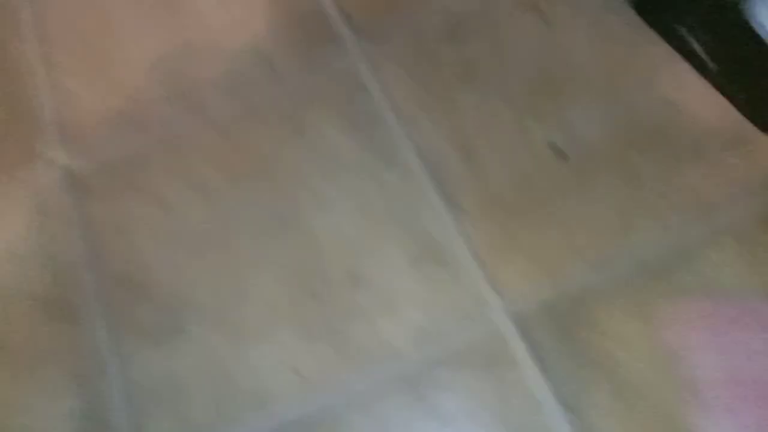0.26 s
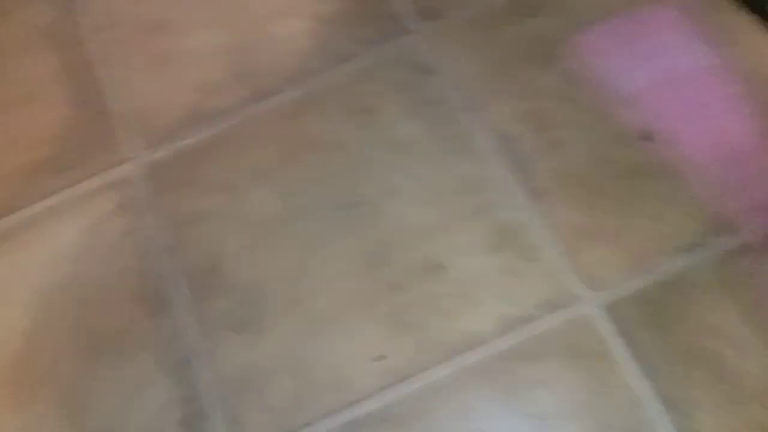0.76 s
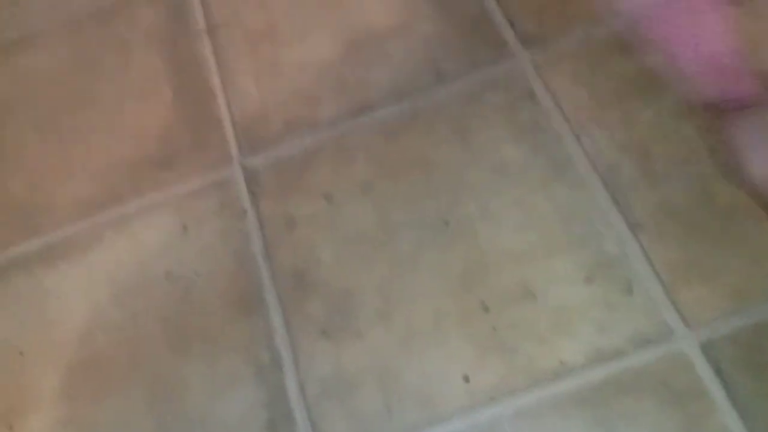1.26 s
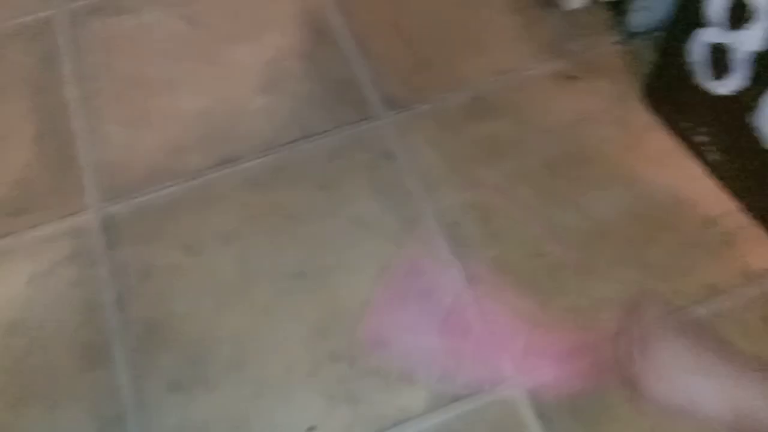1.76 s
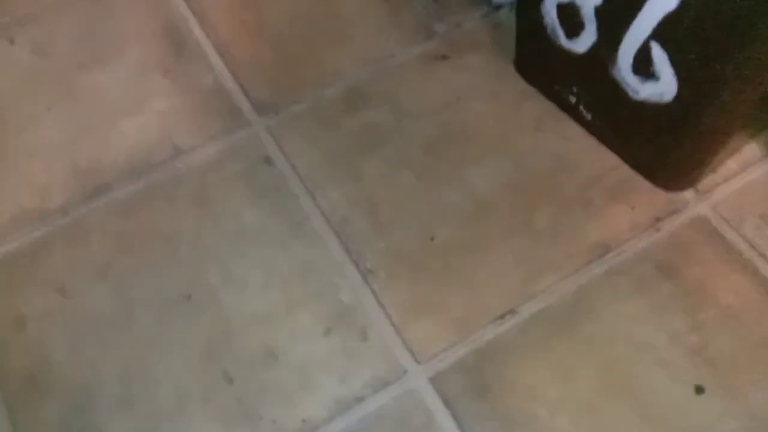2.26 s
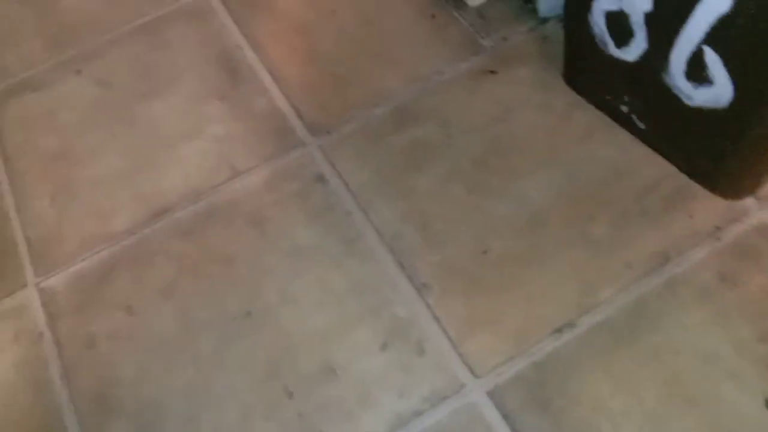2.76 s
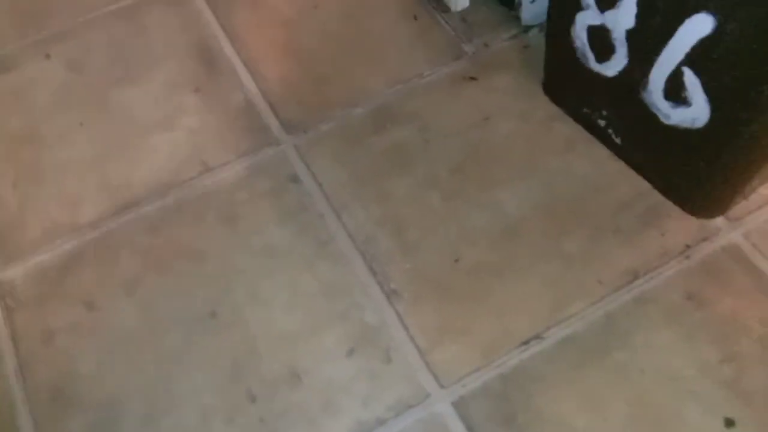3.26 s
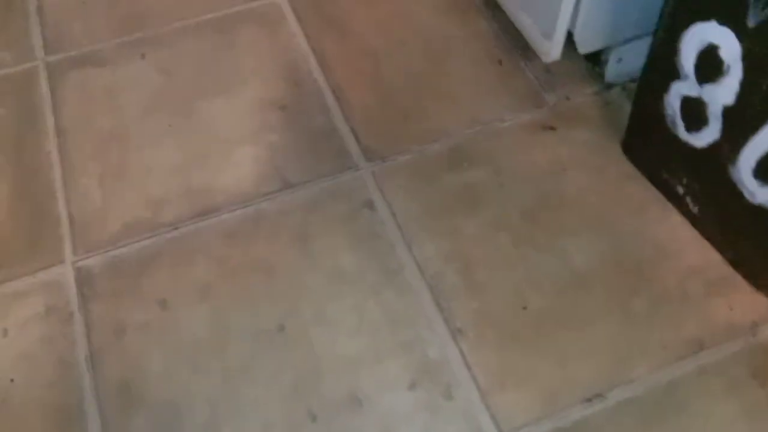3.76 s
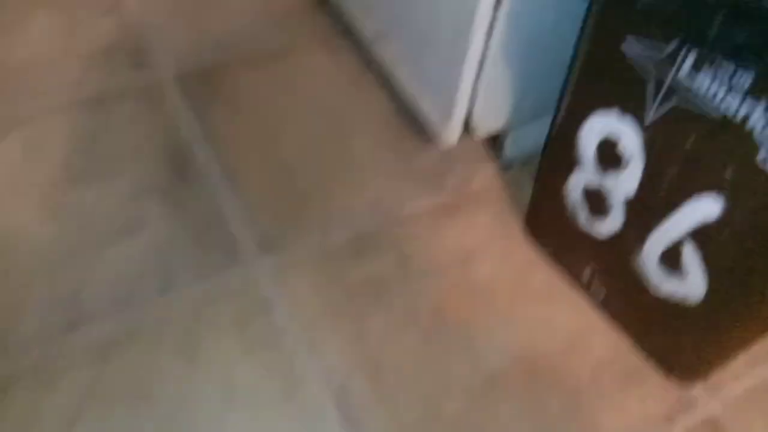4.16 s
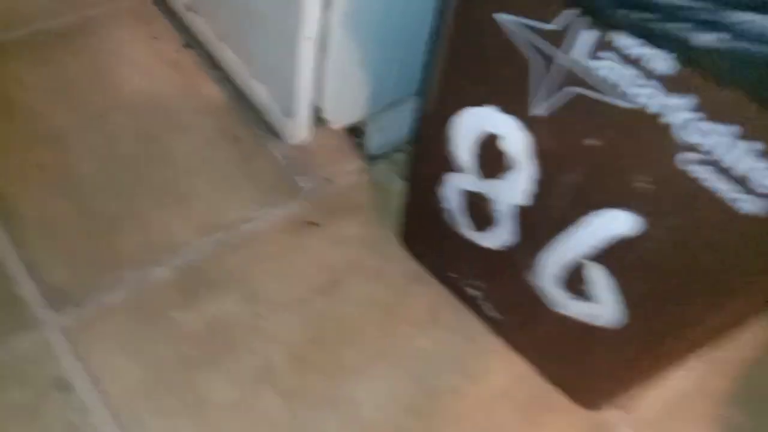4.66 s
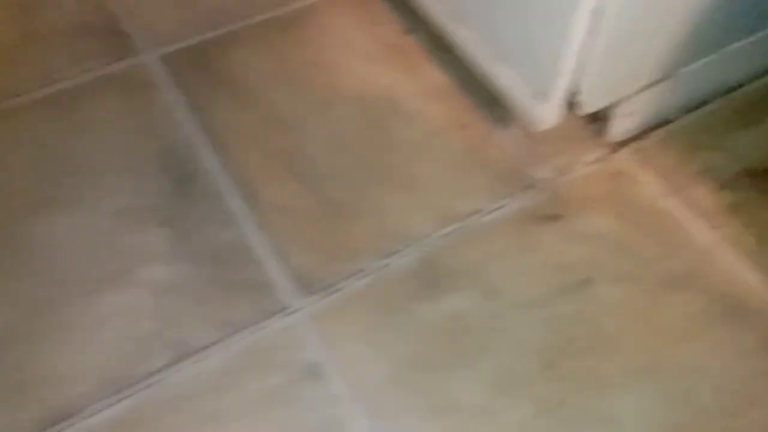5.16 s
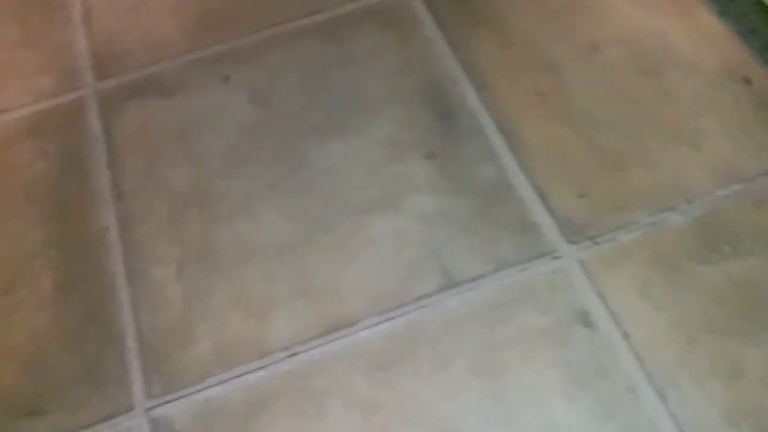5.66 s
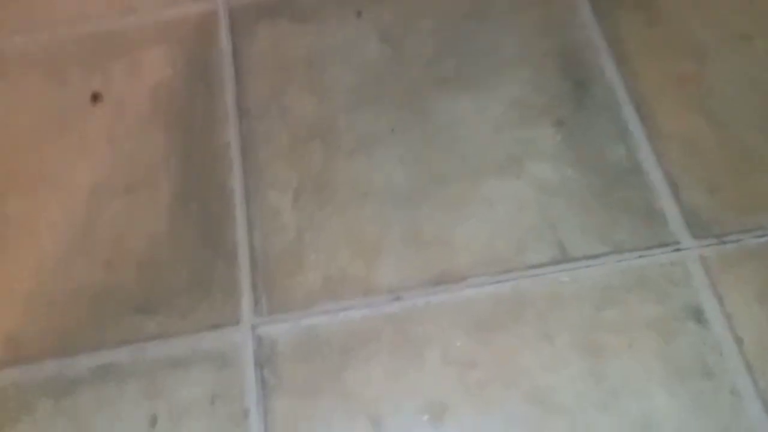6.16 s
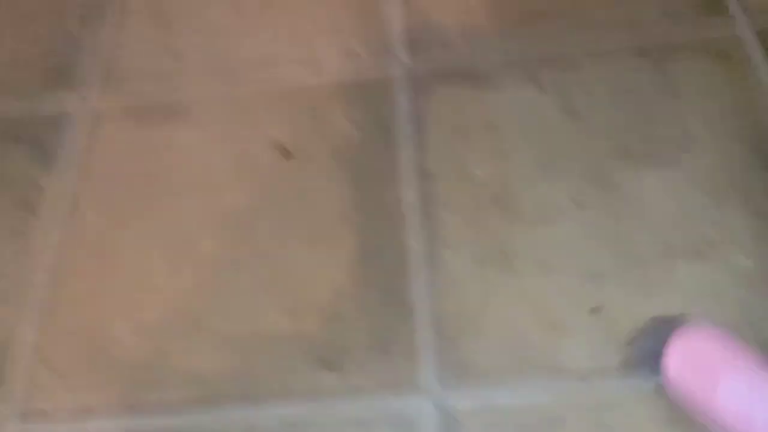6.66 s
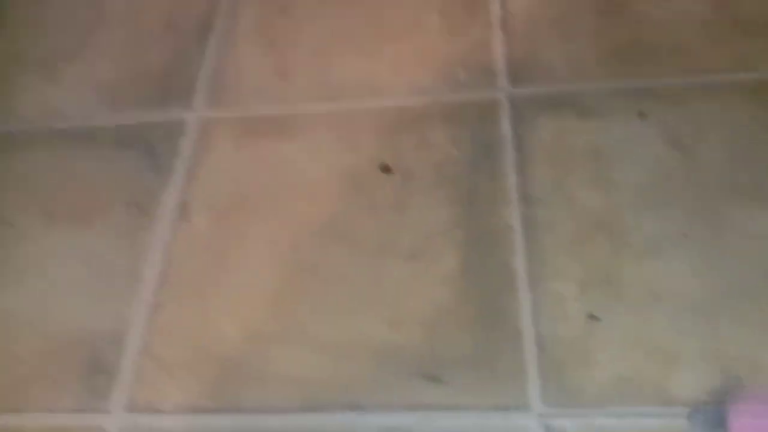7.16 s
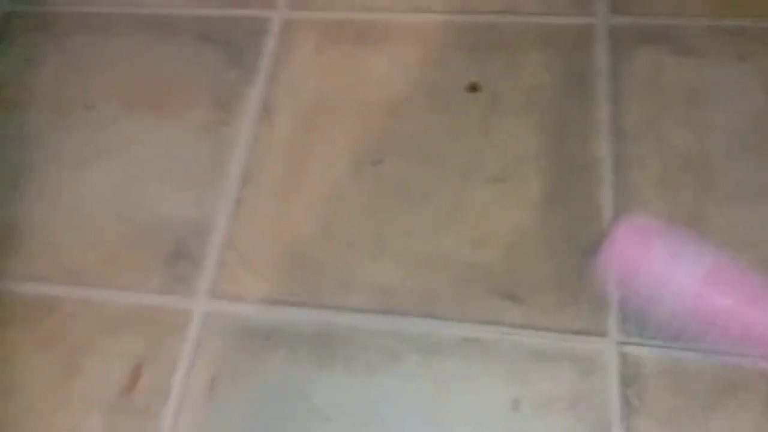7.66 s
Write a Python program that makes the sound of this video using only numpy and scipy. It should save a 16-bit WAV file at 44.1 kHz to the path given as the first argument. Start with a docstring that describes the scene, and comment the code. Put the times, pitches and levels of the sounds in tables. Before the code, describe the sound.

A phone microphone sits close to a hard tiled kitchen floor. From 0 to 1.8 s a hand brush makes quick, uneven strokes: a small tick at the start, then crisp bristle slaps with short scratchy swishes about every 0.15 s or so. After a brief gap, at 2.3-2.8 s a hollow plastic dustpan scrapes loudly, its lip chattering and singing a rough midrange note amid a dense burst of clacks. A softer drag runs from 3.1 to 3.8 s. From 4.1 to 5.0 s scraping and brushing overlap, with hollow bumps near 4.3, 4.8 and 4.9 s. Light taps come around 5.2 s, then plastic knocks at 5.5, 5.7 and a sharp one at 5.8 s. Separate brush strokes follow near 6.2, 6.7, 7.2 and 7.7 s. A short room tail and very faint fridge hum remain beneath.

```python
"""Short strokes of a hand brush over a tiled kitchen floor; in the middle a plastic dustpan is dragged and knocked.
Brush, pan lip and rasping edge are streams of tiny random slips, coloured by filters and shaped by level curves.
Each blow is a noisy push that cracks, rings the hollow pan and thumps the floor; light taps are short spikes.
The hard room answers with a short tail, a hollow bin rings along, and a fridge hums faintly in the still air."""
import sys
import numpy as np
from scipy import signal
from scipy.fft import rfft, irfft, next_fast_len
from scipy.io import wavfile
from scipy.ndimage import uniform_filter1d, map_coordinates

SR = 44100
rng = np.random.default_rng(int(sys.argv[2]) if len(sys.argv) > 2 else 0)


def inscribe(sig):
    """Save sig as 16-bit PCM at rate SR to the path in sys.argv[1].

    A 1-D sig is mono; a 2-D sig holds one channel per row.
    Samples are clipped to [-1, 1] before scaling.
    """
    pcm = np.round(np.clip(np.atleast_2d(sig).T, -1, 1) * 32767)
    wavfile.write(sys.argv[1], SR, pcm.astype(np.int16))


N = 348328
T = np.arange(N) / SR  # time of every sample [s]

# resonances of the pan's hollow shell: (centre [Hz], width [Hz], relative level [dB])
HOLLOW = [(168, 58, -7), (231, 21, 4.5), (260, 120, -2.5), (399, 56, -1), (499.6, 38, -2),
          (650.5, 60, -2.5), (817, 116, -3), (1235, 39, 1), (1880, 210, -5.5), (2577, 840, 3)]
# boom of the floor and room: (centre [Hz], width [Hz], relative level [dB])
SLAB = [(54, 6.3, -13.5), (88.3, 16, -3), (142, 23, -3.5)]


def amp(db):
    """Turn decibels into a plain gain."""
    return 10 ** (np.asarray(db) / 20)


def along(points, hz):
    """Read (Hz, value) points at any frequency, on a log axis."""
    f, v = np.transpose(points)
    return np.interp(np.log(hz + 1), np.log(f + 1), v)


def gains(tables):
    """One gain per sample for each dB column; silence outside the tables."""
    out = np.zeros((len(tables[0][0]) - 1, N))
    for rows in tables:
        s, *cols = np.transpose(rows)
        inside = (T >= s[0]) & (T < s[-1])
        out[:, inside] += amp([np.interp(T[inside], s, c) for c in cols])
    return out


def wobble(rate):
    """A smooth random curve with rate knots a second."""
    knots = rng.standard_normal(int(N * rate / SR) + 4)
    return map_coordinates(knots, [T * rate])


def filtered(x, response):
    """Pass x through a filter given as a function of frequency."""
    m = next_fast_len(len(x) + SR // 4)
    spectrum = rfft(x, m) * response(np.fft.rfftfreq(m, 1 / SR))
    return irfft(spectrum, m)[:len(x)]


def modes(table):
    """Filter of (Hz, width, dB) resonances that ring only after they are hit; their signs alternate."""
    def response(f):
        total = 0
        for k, (centre, width, db) in enumerate(table):
            resonance = 1j * f * width / (centre * centre - f * f + 1j * f * width)
            total = total + (-1) ** k * amp(db) * resonance
        return total
    return response


def shape(points):
    """Filter that follows (Hz, dB) points."""
    return lambda f: amp(along(points, f))


def rub(response, band, spiky_db):
    """Rubbing is many tiny slips of uneven size, filtered; scaled to rms 1 inside the band [Hz]."""
    slips = rng.standard_normal(N) * amp(spiky_db * rng.standard_normal(N))
    f = np.arange(1, SR // 2)
    inside = np.abs(response(f)) * (f > band[0]) * (f < band[1])
    return filtered(slips, response) / np.std(slips) / np.sqrt(np.mean(inside ** 2))


def patchy(x, patchy_db):
    """Uneven glaze and grit: the colour of a rub shifts in small random patches of time and pitch."""
    z = signal.stft(x, nperseg=512)[2]
    field = uniform_filter1d(rng.standard_normal(z.shape), 4, 0)
    field = uniform_filter1d(field, 6, 1)
    return signal.istft(z * amp(patchy_db * field / np.std(field)), nperseg=512)[1][:N]


def brush():
    """Bristle tips tick over the glaze and shake the head that holds them."""
    # colour of the brushing as picked up, dipped near 8-10 kHz and raised near 15 kHz:
    # (frequency [Hz], relative level [dB])
    brushing_colour = [(300, -39), (464, -25.5), (671, -3), (1090, -21), (1250, 0), (2130, -2), (2790, 0.5),
                       (6780, 3.5), (8160, -10.5), (9810, -6), (13500, -13.5), (15200, -2.5), (16500, -35)]
    # resonances of the brush head: (centre [Hz], width [Hz], relative level [dB])
    head = [(610, 210, 3), (1200, 380, 4)]
    tips = rub(shape(brushing_colour), (8000, 16000), spiky_db=3)
    shake = rub(modes(head), (300, 1600), spiky_db=3)
    tip_gain, head_gain = strokes()
    unsteady = amp(1.9 * wobble(60))
    return unsteady * (tip_gain * tips + head_gain * amp(2 * wobble(30)) * shake)


def strokes():
    """Gains of tips and head: slaps that die away and sweeps that swell, hold and lift."""
    # the bristles slap down on the tiles: (time [s], relative level of the tips [dB])
    slap_table = [(.272, -35.5), (0.564, -36.5), (.688, -45), (0.821, -32.5), (.953, -35.5), (1.075, -40),
                  (1.128, -47.5), (1.261, -45), (1.272, -37), (1.405, -28), (1.744, -30.5), (2.351, -34),
                  (2.683, -29.5), (5.21, -42.5), (5.725, -32), (6.169, -39), (6.646, -46.5), (7.188, -43.5),
                  (7.218, -42), (7.727, -53.5)]
    # sweeps: (full contact [s], lift [s], relative tip level at contact [dB], at lift [dB],
    #          shake of the head over the tips [dB], fall after the lift [dB/s])
    sweep_table = [(0, 0.064, -43, -42.5, 0.5, 368), (0.337, 0.389, -43, -43.5, -3.5, 331),
                   (0.61, 0.652, -48.5, -45, -5.5, 398), (0.871, 0.898, -49.5, -47.5, -1, 498),
                   (1.18, 1.21, -49.5, -42.5, -2.5, 551), (1.471, 1.498, -49, -50, -11, 380),
                   (1.77, 1.801, -71, -46.5, -5.5, 452), (2.506, 2.677, -48.5, -47.5, -8, 608),
                   (2.741, 2.78, -56, -59.5, 2.5, 140), (3.258, 3.662, -55.5, -65, -10, 199),
                   (4.147, 5.03, -43.5, -46, -2.5, 150.5), (5.163, 5.695, -66.5, -69, -5, 299),
                   (5.782, 5.986, -45, -47, 3.5, 391.5), (6.27, 6.359, -44, -45.5, -12, 295.5),
                   (6.72, 6.896, -49, -43, -7, 286), (7.258, 7.4, -46.5, -41.5, -2, 227),
                   (7.745, 7.9, -50, -44, 0, 300)]
    slap_rise_s, slap_t60_s = 0.0012, 0.033
    splay_db, splay_t60_s = -17.5, 0.12  # the bent bristles settle longer than the slap
    slap_head_db = -12.5  # shake of the head over the tips in a slap
    press_db_per_s = 353.5  # swell before full contact

    s, db = np.transpose(slap_table)[:, :, None]
    since = np.arange(SR // 4) / SR
    fall = amp(-60 * since / slap_t60_s) + amp(splay_db - 60 * since / splay_t60_s)
    slaps = amp(db) * fall * (1 - np.exp(-since / slap_rise_s))
    at = (s * SR).astype(int) + np.arange(len(since))
    slap_gain = np.bincount(at.ravel(), slaps.ravel(), N + len(since))[:N]
    out = slap_gain * amp([[0], [slap_head_db]])  # row 0: tips, row 1: head
    for start, lift, start_db, lift_db, head_db, fall_db_per_s in sweep_table:
        swell_db = press_db_per_s * np.clip(start - T, 0, 1)
        lift_off_db = fall_db_per_s * np.clip(T - lift, 0, 1)
        held_db = np.interp(T, [start, lift], [start_db, lift_db])
        out += amp(held_db - swell_db - lift_off_db) * amp([[0], [head_db]])
    return out


def pan():
    """The lip chatters over the tiles, sings its note and drives the shell and the floor."""
    # three pan drags, then a faint rustle with one jolt:
    # (time [s], relative lip scrape [dB], relative hollow boom [dB])
    drags = [
        [(2.305, -74, -57.5), (2.353, -45.5, -30.5), (2.397, -39.5, -35.5), (2.473, -29, -25),
         (2.505, -26, -27.5), (2.571, -20, -32.5), (2.634, -28, -34.5), (2.687, -27.5, -28),
         (2.737, -37.5, -25), (2.96, -64.5, -66.5), (3.07, -82, -84)],
        [(3.112, -55, -54), (3.16, -68, -56), (3.2, -44, -40), (3.288, -36.5, -33.5), (3.34, -35, -33),
         (3.44, -36, -30), (3.475, -39, -38), (3.65, -43.5, -38), (3.774, -54, -49.5), (3.841, -59, -40),
         (3.899, -63.5, -80.5), (4.02, -68, -87.5)],
        [(4.072, -39.5, -47), (4.2, -41, -45), (4.327, -25, -36.5), (4.402, -41.5, -47.5), (4.619, -46, -41),
         (4.786, -30.5, -22), (4.867, -41, -37.5), (4.93, -30, -19), (5.024, -38.5, -30.5), (5.14, -59, -74)],
        [(5.14, -59, -66), (5.46, -55, -66.5), (5.49, -44, -23), (5.542, -61, -54), (5.7, -54.5, -64)],
    ]
    # the lip's note, a curve for each of the three drags: (time [s], relative level [dB])
    note_curves = [
        [(2.33, -57.5), (2.352, -43.5), (2.576, -19), (2.634, -30.5), (2.746, -24), (2.96, -70)],
        [(3.18, -50), (3.278, -36), (3.454, -30), (3.48, -50), (3.866, -62), (3.9, -75)],
        [(4.08, -55), (4.298, -42), (4.608, -53), (4.762, -31), (5.036, -38), (5.14, -65)],
    ]
    # colour of the lip's scrape: (frequency [Hz], relative level [dB])
    lip_colour = [(880, -37), (1500, 1.5), (2280, 1), (2990, -3.5), (3200, -0.5), (3920, -2), (6720, -8.5),
                  (7860, -25.5), (11700, -49.5), (19800, -120)]
    # resonances of the lip's note: (centre [Hz], width [Hz], relative level [dB])
    lip_ring = [(1228, 113, 4.5), (1327, 61, 2)]
    (lip, boom), (note,) = gains(drags), gains(note_curves)
    chatter = wobble(45)  # shared, so lip, note and shell rise and fall together
    lip_unsteady = amp(2.5 * chatter + 2.6 * wobble(160))
    lip = lip * lip_unsteady * rub(shape(lip_colour), (1800, 7500), spiky_db=6.5)
    note = note * amp(2.1 * chatter) * rub(modes(lip_ring), (1150, 1420), spiky_db=1.0)
    shell = rub(modes(HOLLOW[:-3]), (150, 1000), spiky_db=2.5)
    shell_unsteady = amp(3.5 * chatter + 3 * wobble(18))
    floor = amp(-12.5) * rub(modes(SLAB), (40, 150), spiky_db=3.0)
    return lip + note + boom * (shell_unsteady * shell + floor)


def knocks():
    """Each contact is a rough push that cracks, rings the shell modes nearest the struck spot and thumps the floor."""
    # blows, landings and shoves: (time [s], relative crack level [dB], time to peak force [ms, 12 at most],
    #                              relative hollow knock [dB], knock centre [Hz], relative floor thud [dB])
    knock_table = [(0.2724, -34, 5.1, -41.5, 544, -47), (0.4036, -44, 2.9, -40.5, 900, -45),
                   (0.564, -27, 4.8, -36, 403, -35.5), (0.687, -20.5, 1.5, -48.5, 495, -40.5),
                   (0.822, -28.5, 7.7, -36.5, 1010, -33), (0.954, -18.5, 1.4, -37, 910, -41),
                   (1.0752, -33.5, 14, -43, 660, -42.5), (1.269, -16, 2.5, -39, 850, -40),
                   (1.4065, -26.5, 4.5, -35, 930, -33), (1.7455, -32.5, 5.1, -43.5, 1270, -36.5),
                   (2.309, -55.5, 2.9, -43, 282.5, -48), (2.3498, -21.5, 2.6, -31.5, 402, -44),
                   (2.471, -9.5, 3.9, -33, 500, -38), (2.5405, -12.5, 5.8, -34, 1250, -53),
                   (2.5619, -3.5, 6.2, -32, 1183, -48), (2.6474, -8.5, 5.6, -36, 1225, -42),
                   (2.683, -5.5, 2.1, -17, 326, -32), (2.7181, -15, 1.1, -25, 501, -37),
                   (2.7311, -3, 1.7, -32, 953, -31), (2.7407, -21.5, 2.5, -26, 1280, -41),
                   (2.7825, -8.5, 2, -36.5, 583, -29), (3.1107, -33, 4.8, -44.5, 378, -62),
                   (3.1807, -32, 3, -64, 735, -65), (3.8245, -45, 9.3, -38, 469, -69),
                   (4.2763, -11.5, 1.9, -32, 960, -35), (4.3158, -11.5, 9, -27.5, 2600, -42),
                   (4.3434, -28, 4.4, -36.5, 201, -21.5), (4.77, -22, .6, -17.5, 420, -33),
                   (4.781, -13, 1.75, -18.5, 256, -24.5), (4.9132, -17.5, .8, -27.5, 600, -38),
                   (4.928, -15, 3.4, -28.5, 298, -28), (5.4735, -26, 2.1, -36.5, 790, -46),
                   (5.4865, -13.5, 2.5, -26, 659, -42.5), (5.7247, -10.5, 0.98, -26, 562, -37.5),
                   (5.8239, -1.5, 1.2, -16.5, 860, -61), (5.836, -25.5, 2.3, -21.5, 491, -64),
                   (5.866, -17.5, 4, -30, 600, -66), (6.1671, -29.5, 3.9, -49.5, 1125, -49.5),
                   (6.6434, -23.5, 4.8, -48.5, 747, -40), (6.8895, -25, 2, -31, 1306, -41.5),
                   (7.185, -27.5, 5.3, -41, 750, -41), (7.398, -21, 10.5, -41.5, 1260, -61),
                   (7.659, -30, 5, -41.5, 1810, -58.5), (7.726, -26, 4, -42.5, 1210, -68)]
    # colour of the crack: (frequency [Hz], relative level [dB])
    crack_colour = [(590, -31), (1000, -5), (3690, -6.5), (7090, -16), (9000, -45.5), (19800, -120)]
    grip, grip_hz = 1.5, 19  # a held shell is damped: each mode's width is multiplied, then gains 19 Hz
    push_s = 0.0017  # time to the peak of the soft push into the floor

    t = np.arange(SR // 8) / SR
    out = np.zeros((3, N + len(t)))
    hz, width, db = np.transpose(HOLLOW)[:, :, None]
    push = t * np.exp(-t / push_s)
    for s, crack_db, contact_ms, knock_db, spot_hz, thud_db in knock_table:
        u = 1000 * t / np.clip(contact_ms, .1, 12)
        force = u * np.exp(1 - u)
        noise = rng.standard_normal((2, len(t)))

        far_db = 17 * np.abs(np.log2(hz / spot_hz))  # modes far from the spot's pitch ring less
        share = amp(db + rng.normal(0, 2.4, hz.shape) - far_db)
        decay = np.exp(-np.pi * (grip * width + grip_hz) * t)
        detuned_hz = hz * amp(rng.normal(0, 0.25, hz.shape))
        ring = (share * decay * np.sin(2 * np.pi * detuned_hz * t)).sum(0)
        ring = signal.fftconvolve(ring, force * noise[1])[:len(t)]
        # little sounds far below the spot
        ring = filtered(ring, lambda f: (2j * f / (spot_hz + 2j * f)) ** 1.8)
        ring /= np.std(ring[:SR // 40])

        clatter = force + 0.41 * amp(-60 * t / 0.072)  # loose parts go on rattling
        snap = clatter * noise[0]
        snap = snap / np.abs(snap).max()
        blow = [amp(crack_db) * snap, amp(knock_db) * ring, amp(thud_db) * push / push.sum()]
        out[:, round(s * SR):][:, :len(t)] += blow
    crack, knock, thud = out[:, :N]
    crack = amp(11.0) * filtered(crack, shape(crack_colour))
    knock = filtered(knock, lambda f: (1j * f / (130 + 1j * f)) ** 2)  # a small shell radiates no deep bass
    thud = amp(61.5) * filtered(thud, modes(SLAB))
    return crack + knock + thud


def rasps():
    """A plastic edge rasps along the tiles: short fading rubs, each in one broad resonance."""
    # rasps: (time [s], fade length [s], centre [Hz], relative level [dB])
    rasp_table = [(0, 0.066, 2070, -40), (3.921, 0.048, 5150, -57), (4.071, .04, 3300, -44),
                  (4.078, 0.11, 1900, -37), (5.24, 0.3, 1500, -57), (6.642, 0.062, 703, -37.5),
                  (7.661, 0.1, 1800, -46)]
    sharpness, fade_db = 5.3, 6.5  # centre over width; drop after one fade length
    out, t = np.zeros(N + SR), np.arange(SR // 4) / SR
    for s, length, hz, db in rasp_table:
        resonance = modes([(hz, hz / sharpness, 0)])
        grit = filtered(rng.standard_normal(len(t)), lambda f: resonance(f) ** 2)
        fade = amp(db - fade_db * (t / length) ** 2) * (1 - np.exp(-t / .004))
        out[round(s * SR):][:len(t)] += fade * grit / np.std(grit)
    return out[:N]


def ticks():
    """Light hard taps of an edge: a spike and its brief rustle in one broad resonance, dull above it."""
    # taps: (time [s], peak level [dB], centre [Hz])
    tick_table = [(0.061, -10, 1884), (1.9855, -57, 4000), (2.114, -57.5, 5000), (5.2113, -27, 5600),
                  (5.2363, -22.5, 5000), (5.4363, -31, 2920)]
    sharpness, t60_s = 0.78, 0.03  # centre over width; time for the rustle to fall 60 dB
    out, t = np.zeros(N + SR), np.arange(SR // 16) / SR
    for s, db, hz in tick_table:
        burst = 0.16 * amp(-60 * t / t60_s) * rng.standard_normal(len(t))
        burst[0] = 1
        resonance = modes([(hz, hz / sharpness, 0)])
        tick = filtered(burst, lambda f: resonance(f) ** 2 / (1 + 1j * f / (2 * hz)) ** 2)
        out[round(s * SR):][:len(t)] += amp(db) * tick / np.abs(tick).max()
    return out[:N]


def hollow_bin(near):
    """A hollow bin nearby rings on in sympathy with the sounds near it."""
    # the bin's resonance: (centre [Hz], width [Hz], level [dB])
    bin_ring = [(1283, 5, 4.5)]
    return filtered(near, modes(bin_ring))


def kitchen(x):
    """A noise tail with its decay set by frequency points; sources move, so each moment gets a new tail."""
    # tail decay set by frequency points, much shorter above 8 kHz: (frequency [Hz], time to fall 60 dB [s])
    tail_t60 = [(80, 0.48), (300, 0.32), (1300, 0.3), (6500, 0.24), (8000, 0.12), (15000, 0.082)]
    hop = SR // 4
    count = N // hop + 2
    hz, t, z = signal.stft(rng.standard_normal((count, 2 * hop)), SR, nperseg=512)
    decay = amp(-60 * t / along(tail_t60, hz)[:, None])
    tails = signal.istft(z * decay, SR, nperseg=512)[1][:, :2 * hop]
    # cut the sound into overlapping, smoothly faded pieces
    padded = np.pad(x, (hop, 3 * hop))
    starts = hop * np.arange(count)[:, None]
    pieces = np.hanning(2 * hop) * padded[starts + np.arange(2 * hop)]
    wet = signal.fftconvolve(pieces, tails / np.linalg.norm(tails[0]), axes=1)
    out = np.zeros((count + 4) * hop)
    for k, piece in enumerate(wet):
        out[k * hop:][:len(piece)] += piece
    return np.pad(out[hop:], (220, 0))[:N]  # the first walls answer after 5 ms


def fridge():
    """Compressor tones, slightly unsteady, over the still air of the room."""
    # compressor tones: (frequency [Hz], relative level [dB])
    partials = [(242.2, -76), (640.6, -82.5), (888.2, -77.5), (1087, -83), (1287, -80.5)]
    # colour of the room's murmur: (frequency [Hz], relative level [dB])
    air_colour = [(25, -23.5), (97, 2.5), (125, 3), (185, -14.5), (400, -15.5), (1100, -27), (1310, -17),
                  (1570, -31), (7200, -34), (8200, -52), (16000, -69.5)]
    air_db, air_fall_db_per_s = -65.5, .6  # the murmur eases off slowly
    hum = 0
    for hz, db in partials:
        unsteady = amp(db - 1.5 + 4 * wobble(3))
        hum = hum + unsteady * np.sin(2 * np.pi * (hz * T + rng.random()))
    air_gain = amp(air_db - air_fall_db_per_s * T + 3 * wobble(3.3))
    return hum + air_gain * rub(shape(air_colour), (25, 12000), spiky_db=3.0)


def scene():
    """Everything on the floor, close by, in the tiled room; the small taps stir the room less."""
    rubbing = patchy(brush() + pan() + rasps(), patchy_db=2.0)
    near = amp(-3.5) * rubbing + knocks()
    taps = ticks()
    room = amp(-8.0) * kitchen(near + 0.44 * taps)
    return (near + taps + room + hollow_bin(near) + fridge())[None]


def record(dry):
    """The phone drops the deep bass, rounds the loudest peaks, dulls its last kilohertz and keeps nothing above."""
    top, top_hz = .8, 16600  # level the rounded peaks approach; highest frequency kept
    x = filtered(dry[0], lambda f: (1j * f / (45 + 1j * f)) ** 2)
    x = x / (1 + (x / top) ** 4) ** (1 / 4)
    return filtered(x, lambda f: (f < top_hz) * amp(np.interp(f, [15300, 15600], [0, -25])))[None]


dry = scene()
out = record(dry)
inscribe(out)
```